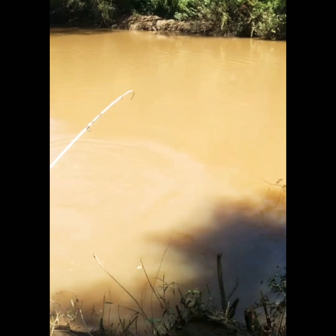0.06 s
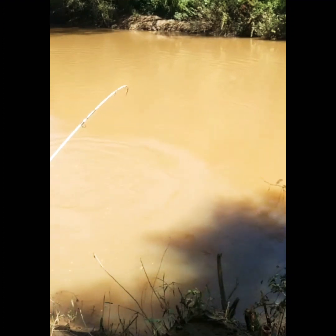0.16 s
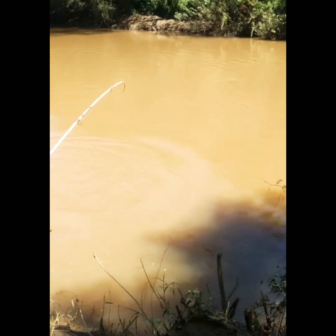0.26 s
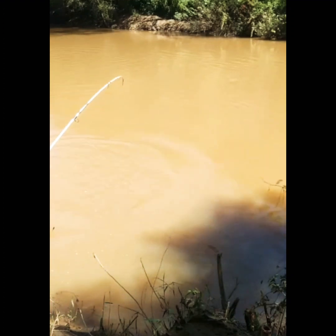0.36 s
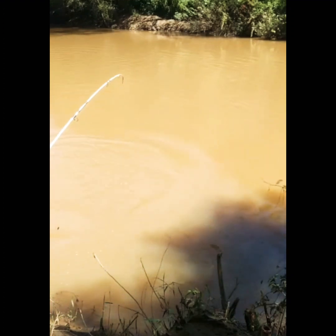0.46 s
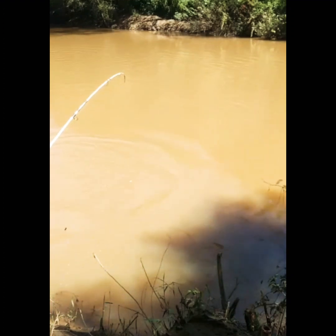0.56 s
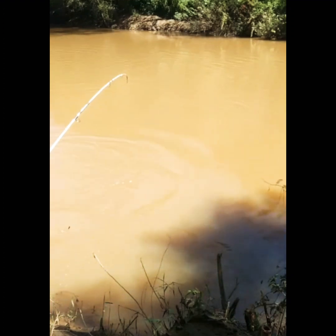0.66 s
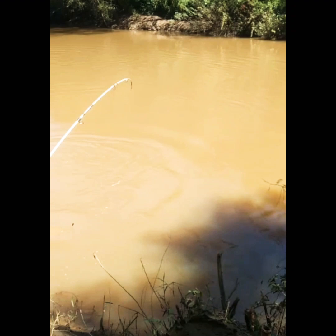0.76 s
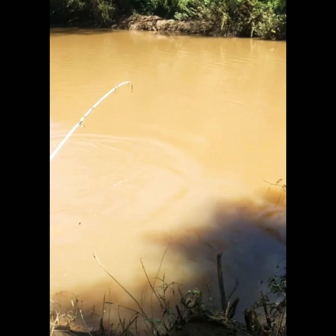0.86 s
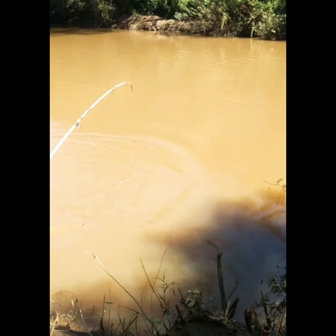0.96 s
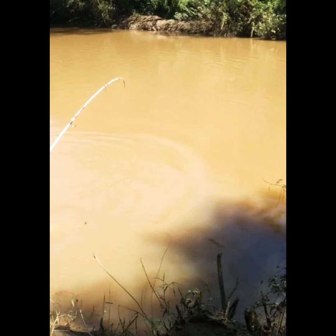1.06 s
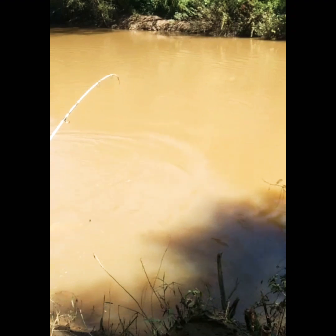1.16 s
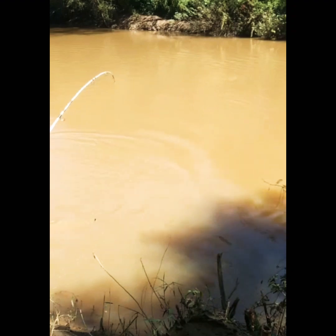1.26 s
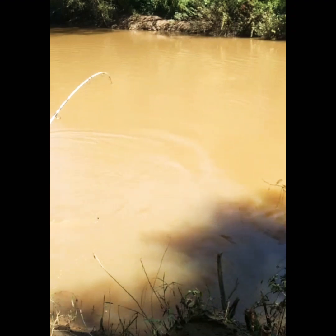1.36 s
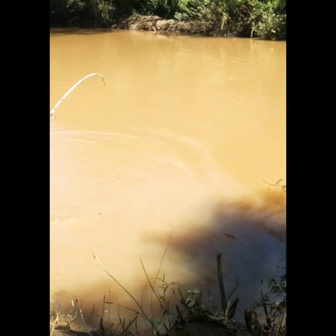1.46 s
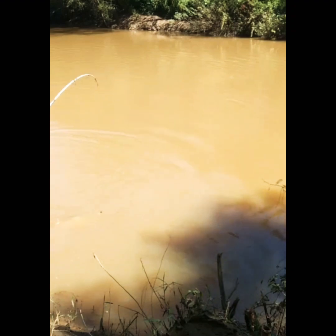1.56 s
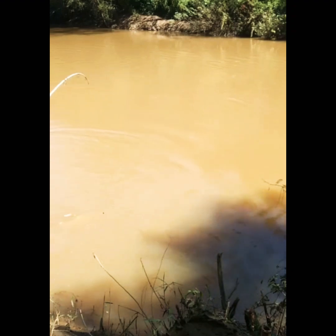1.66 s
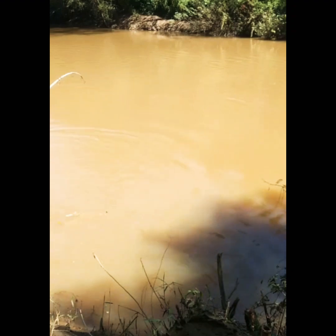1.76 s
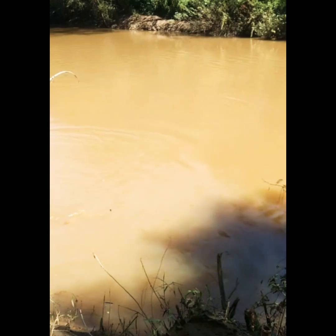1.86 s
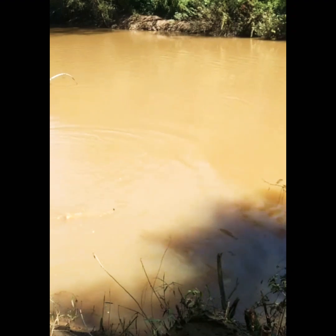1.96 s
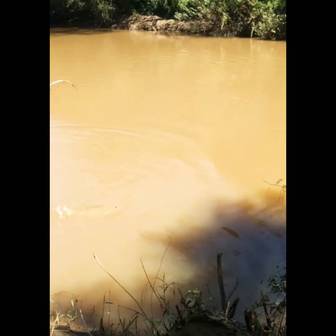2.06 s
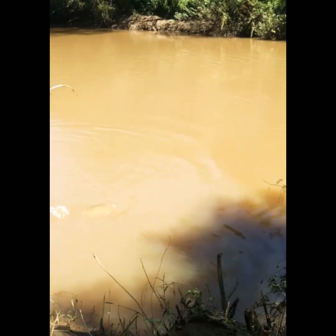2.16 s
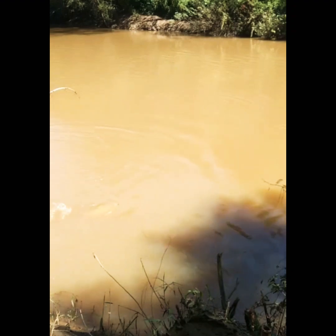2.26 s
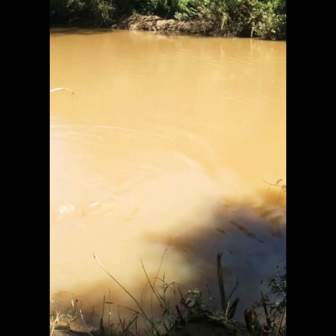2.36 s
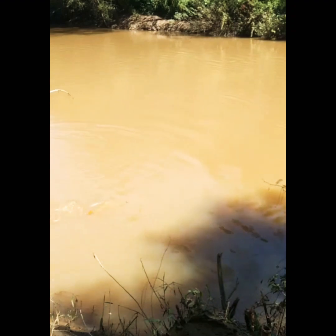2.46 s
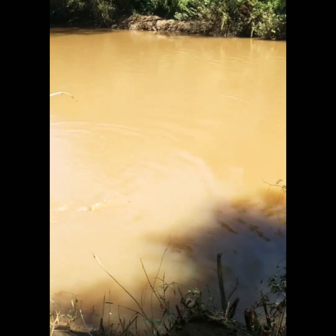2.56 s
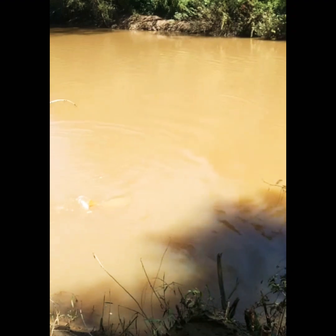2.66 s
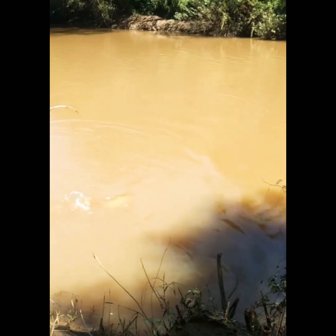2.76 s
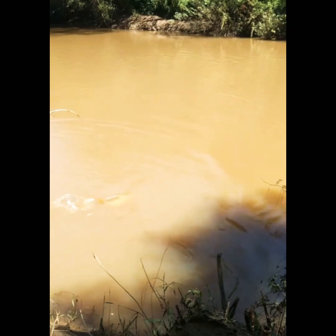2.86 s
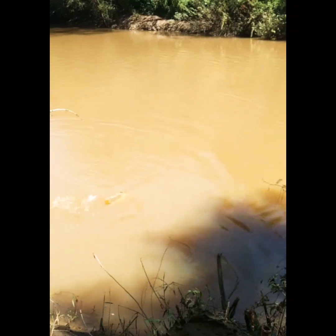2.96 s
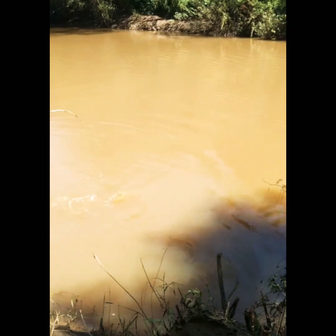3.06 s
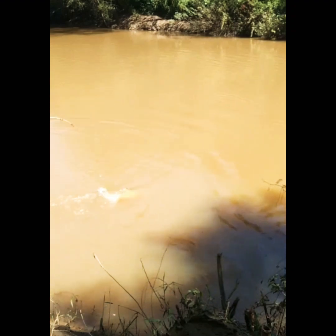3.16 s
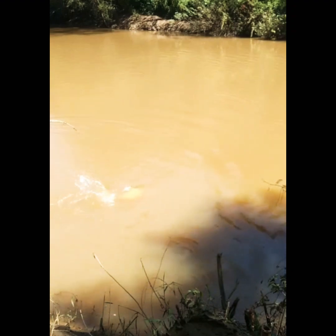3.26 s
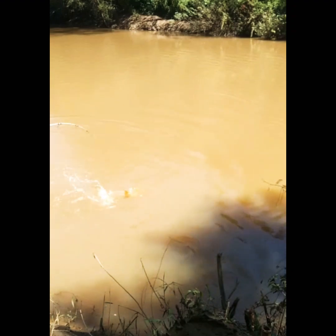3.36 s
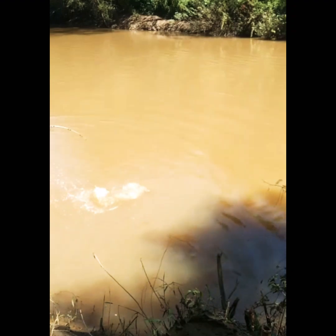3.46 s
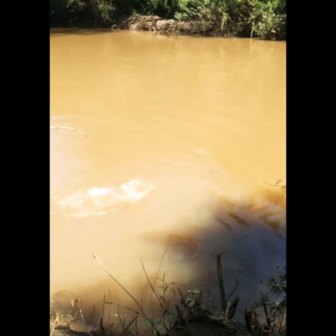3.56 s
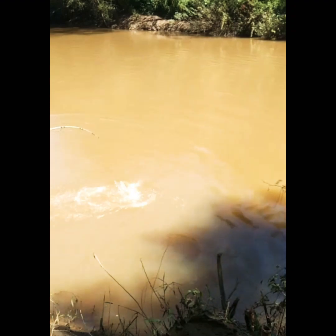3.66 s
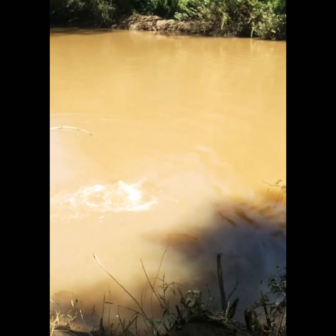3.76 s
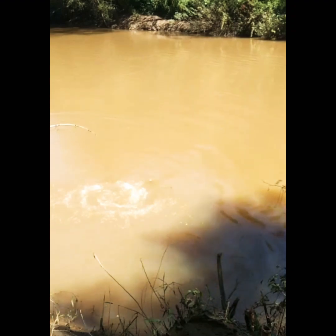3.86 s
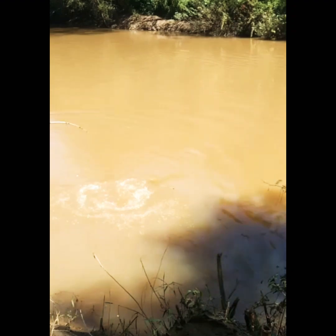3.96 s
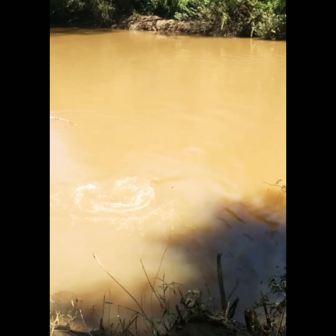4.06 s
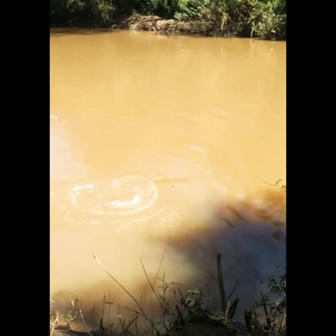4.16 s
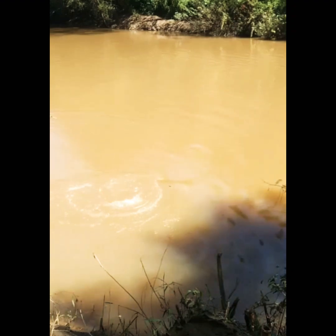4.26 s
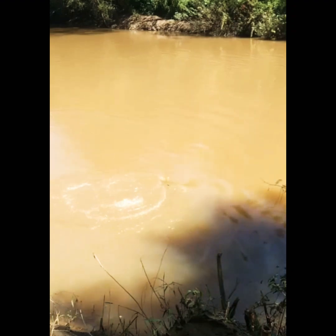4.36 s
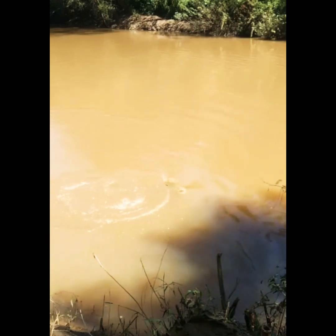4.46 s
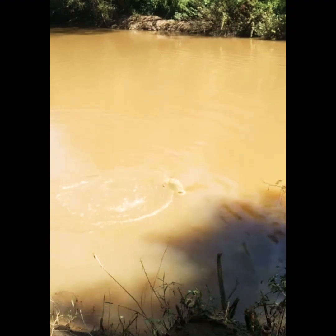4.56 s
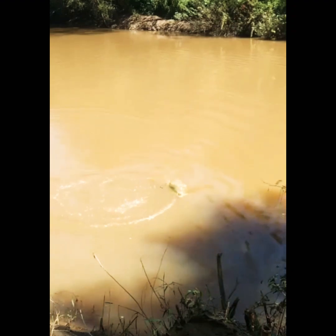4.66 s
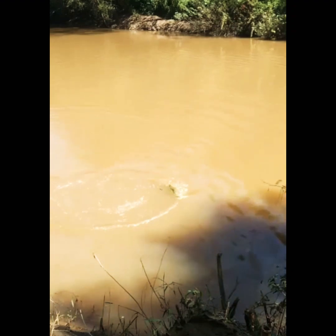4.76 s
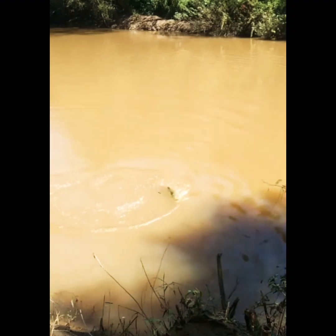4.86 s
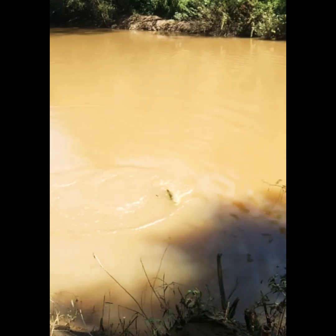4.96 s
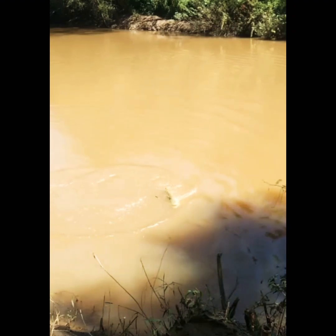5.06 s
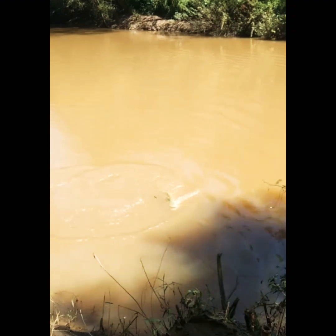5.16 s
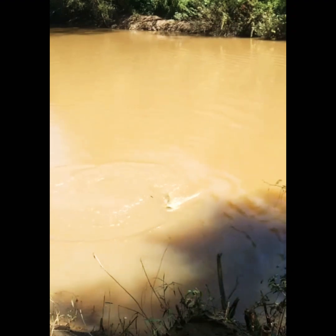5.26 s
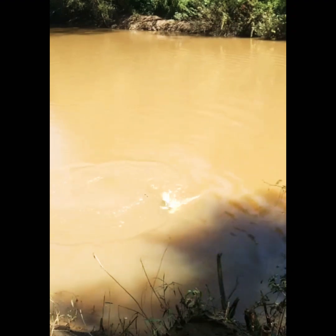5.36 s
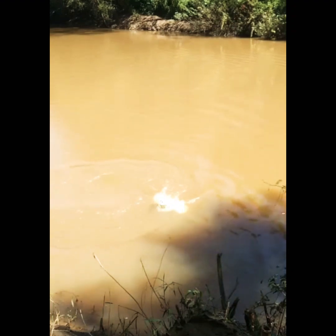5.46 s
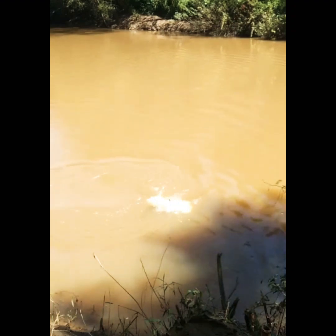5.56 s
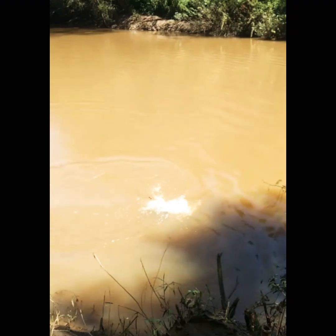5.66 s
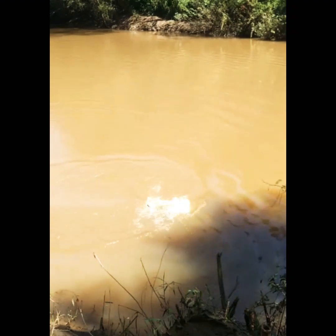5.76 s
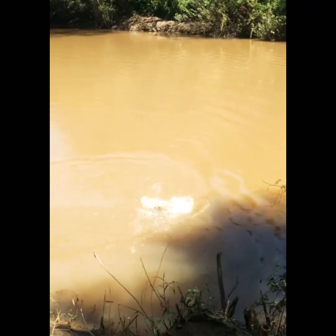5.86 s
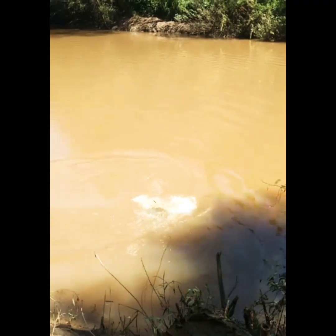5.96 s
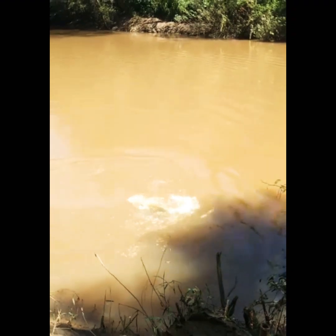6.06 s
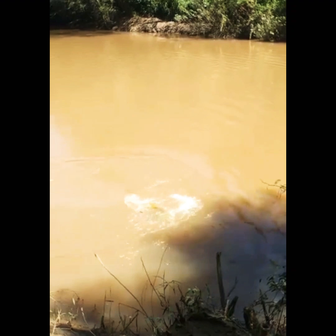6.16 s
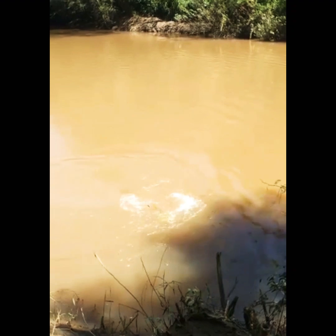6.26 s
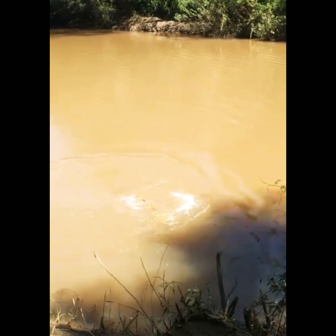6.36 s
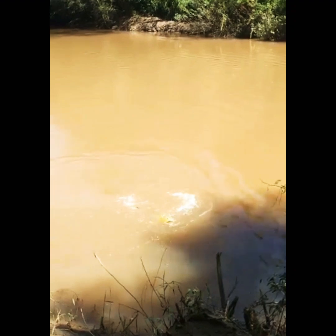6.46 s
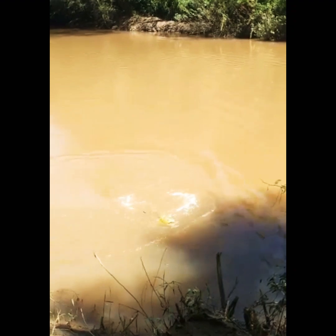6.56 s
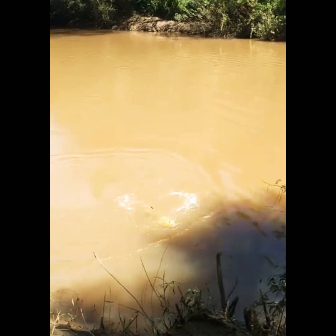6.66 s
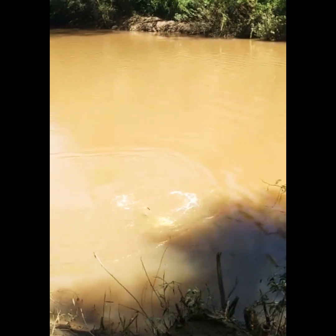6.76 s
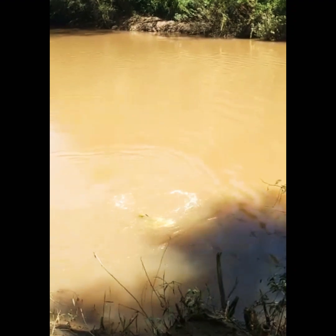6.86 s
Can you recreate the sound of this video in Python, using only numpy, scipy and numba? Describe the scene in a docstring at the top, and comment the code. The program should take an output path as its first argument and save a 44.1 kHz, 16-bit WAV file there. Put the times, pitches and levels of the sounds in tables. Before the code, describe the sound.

Quiet riverbank water ticks and plops, then two bursts of churning splashes, each gurgling and pattering away into near silence.

```python
"""A hooked fish thrashes twice at the surface of a slow muddy river, close to a phone on the bank.
Thrashes and short flicks are crowds of ringing bubbles and droplet grains with moving levels; slaps
are bursts of shaped noise. Single bubbles plop and glide over a noise hush, a narrow-band insect
whine and faint tone whistles. The phone steers its two microphone ports into a stereo pair."""
import sys
import numpy as np
from scipy import signal
from scipy.fft import rfft, irfft
from scipy.io import wavfile
from scipy.ndimage import uniform_filter1d
from numba import njit

SR = 44100
rng = np.random.default_rng(int(sys.argv[2]) if len(sys.argv) > 2 else 0)


def pcm_store(signal):
    """Save signal as 16-bit PCM."""
    levels = np.round(np.clip(np.atleast_2d(signal), -1, 1) * 32767)
    wavfile.write(sys.argv[1], SR, levels.astype(np.int16).T)


N = 304290


def gain_of(db):
    """Decibels to amplitude gain."""
    return 10 ** (np.asarray(db) / 20)


def evened(x):
    """Scales to rms 1."""
    return x / np.sqrt(np.mean(x ** 2) + 1e-20)


def read(points, hz):
    """Interpolates a (freq_hz, value) table on a log-frequency axis."""
    freq_hz, value = np.transpose(points)
    return np.interp(np.log(hz + 1), np.log(freq_hz + 1), value)


def curve(rows):
    """Interpolates every column of a time table at each sample."""
    time_s, *columns = np.transpose(rows)
    t = np.arange(N) / SR
    return [np.interp(t, time_s, column) for column in columns]


def colour(x, points, lead_s=0.):
    """Filters by a dB spectrum, with an optional lead in time."""
    hz = np.fft.rfftfreq(N, 1 / SR)
    lead = np.exp(2j * np.pi * hz * lead_s)
    return irfft(rfft(x) * gain_of(read(points, hz)) * lead, N)


def laid(events):
    """Lays (start_s, sound) pairs on one track."""
    out = np.zeros(N + SR)
    for start_s, sound in events:
        out[round(start_s * SR):][:len(sound)] += sound
    return out[:N]


@njit
def add(mix, grains):
    """Mixes in grains that swell, ring and die; rows (first sample, size, turns a sample, cycles, rise)."""
    for k in range(len(grains)):
        start, step, rise = int(grains[k, 0]), grains[k, 2], grains[k, 4]
        length = int(grains[k, 3] / step) + 2
        size = grains[k, 1] / np.sqrt(length)  # energy independent of length
        fade = np.exp(-9 / length)
        turns = 0.
        for i in range(min(length * 3 // 4, len(mix) - start)):
            turns += step * (1 + rise * i / length)
            size *= fade
            mix[start + i] += size * i / length * np.sin(2 * np.pi * turns)


def swarm(pitch, per_s, cycles, rise, uneven_db):
    """Random bubbles of uneven size, rms 1; pitch maps (sample, chance) to (Hz, gain)."""
    place, kind, loud, long, bend = rng.random((int(per_s * N / SR), 5)).T
    at = (place * N).astype(int)
    hz, gain = pitch(at, kind)
    size = gain * gain_of(uneven_db * np.minimum(-np.log(loud), 4))
    grains = np.column_stack([at, size, hz / SR, cycles * (.5 + long), rise * (3 * bend - 1)])
    heard = gain > gain.max() / 10
    out = np.zeros(N)
    add(out, grains[heard])
    return evened(out)


# hush spectrum shape: freq_hz, density_db (per Hz, relative)
HUSH_SPECTRUM = [(15, -60), (25, -12), (53, -0.5), (165, 0.5), (306, -7), (379, -10), (763, -13),
                 (1140, -18), (2180, -37), (3840, -18.5), (4390, -33.5), (6930, -23.5), (15600, -42.5)]
# far port over near port: freq_hz, ratio_db
HUSH_FAR_OVER_NEAR = [(60, -9.5), (300, 10), (800, 6.5), (1150, -6.5), (1750, -29), (2500, -6), (8000, -6),
                      (15000, -3)]
HUSH_RMS_DB = -58.5


def hush():
    """Air and far water: noise unrelated at the two ports, in drifting time-frequency patches."""
    frames, hz = N // 256 + 5, np.fft.rfftfreq(1024, 1 / SR)
    a, b, c, d, patches = rng.standard_normal((frames, 513, 5)).T
    patches = uniform_filter1d(patches, size=12, axis=0)
    patches = evened(uniform_filter1d(patches, size=14, axis=1))
    half_ratio_db = read(HUSH_FAR_OVER_NEAR, hz)[:, None] / 2
    z = np.array([(a + 1j * b) * gain_of(-half_ratio_db), (c + 1j * d) * gain_of(half_ratio_db)])
    z *= gain_of(read(HUSH_SPECTRUM, hz)[:, None] + 2.6 * patches)
    noise = signal.istft(z, nperseg=1024, noverlap=768)[1][:, :N]
    return gain_of(HUSH_RMS_DB) * evened(noise)


def resonate(x, hz, width_hz):
    """Band-passes by shifting hz down to zero, smoothing twice and shifting back."""
    turn = np.exp(2j * np.pi * np.cumsum(hz * np.ones(N)) / SR)
    r = np.exp(-np.pi * width_hz / SR)
    return (turn * signal.lfilter([1], np.convolve([1, -r], [1, -r]), x / turn)).real


def whistle(start_s, length_s, level_db, first_hz, last_hz):
    """A pure tone that swells, slides (wide slides down level off) and fades."""
    u = np.arange(0, length_s, 1 / SR) / length_s
    ratio = last_hz / first_hz
    turns = np.cumsum(first_hz * ratio ** u ** ratio) / SR
    return start_s, gain_of(level_db) * np.sqrt(np.sin(np.pi * u)) * np.sin(2 * np.pi * turns)


# steady insect chorus, one row: centre_hz, width_hz, rms_db
INSECT_WHINE = (6800, 77, -70)
# faint whistles, perhaps far birds: start_s, length_s, level_db, first_hz, last_hz
FAINT_WHISTLES = [(2.475, .045, -58, 2750, 1900), (2.87, .065, -55, 2700, 1700),
                  (3.085, .055, -58, 2800, 1950), (2.585, .22, -68, 6750, 6250),
                  (3.71, .11, -55, 2625, 2635)]


def insects():
    """Narrow-band noise as a fuzzy steady whine, plus the faint whistles."""
    centre_hz, width_hz, rms_db = INSECT_WHINE
    whine = evened(resonate(rng.standard_normal(N), centre_hz, width_hz))
    return gain_of(rms_db) * whine + laid(whistle(*row) for row in FAINT_WHISTLES)


def bubble(hz, cycles, rise_octaves, swell):
    """A pocket of air rings and dies; its pitch climbs as it nears the surface. Envelope peak 1."""
    cycles = max(cycles, 6)
    u = np.arange(int(cycles / hz * SR)) * hz / SR / cycles
    turns = np.cumsum(hz * 2 ** (rise_octaves * u)) / SR
    shape = (1 - np.exp(-u / abs(swell))) ** 2 * gain_of(-60 * u)
    return shape / shape.max() * np.sin(2 * np.pi * turns)


# single bubbles: start_s, level_db (relative), start_pitch_hz, cycles (to -60 dB, at least 6 rung)
SINGLE_BUBBLES = [(.02, -47, 1640, 33), (0.079, -51, 1060, 14), (.222, -45, 493, 11), (.303, -50, 454, 32),
                  (.343, -42.5, 1585, 41), (0.506, -45.5, 1550, 44), (0.517, -41.5, 418, 39),
                  (0.55, -35, 440, 21), (.62, -45, 608, 29), (.64, -47, 764, 27), (.692, -49.5, 1250, 20),
                  (.768, -41, 768, 28), (.932, -29.5, 586.4, 39), (0.936, -22.5, 2290, 9.5),
                  (.935, -29, 597.5, 55), (1.086, -34, 587, 25), (1.086, -37.5, 426, 34),
                  (1.294, -52, 623, 57), (1.33, -55, 1350, 30), (1.514, -49, 1100, 37),
                  (1.539, -51, 1300, 30), (1.556, -37.5, 2630, 40), (1.583, -38.5, 1430, 32),
                  (1.606, -32, 1107, 29), (1.607, -34, 3070, 45), (1.669, -43.5, 1030, 19),
                  (1.703, -42, 1280, 21), (1.75, -41, 1420, 27), (1.854, -48, 1290, 43),
                  (2.083, -45, 1370, 12), (2.083, -46, 2220, 33), (2.172, -43, 2370, 38),
                  (2.19, -48, 1310, 42), (2.231, -28.5, 1310, 36), (2.238, -32, 1030, 46),
                  (2.242, -37, 2320, 49), (2.264, -39.5, 368, 39), (2.305, -39, 2870, 38),
                  (2.306, -32.5, 1120, 22), (2.319, -36.5, 1360, 28), (2.334, -42, 1460, 33),
                  (2.353, -38.5, 1300, 40), (2.372, -37, 1100, 40), (2.408, -29, 986, 11.5),
                  (2.507, -38, 1060, 21), (2.549, -34.5, 1124, 21), (2.59, -33.5, 1640, 17),
                  (2.656, -49.5, 910, 33), (2.72, -54, 1400, 27), (2.812, -41, 1970, 40),
                  (2.838, -45, 1080, 36), (2.852, -42, 2650, 40), (2.866, -32, 1110, 24),
                  (2.92, -40, 1090, 18), (3.01, -40, 2540, 32), (3.04, -51, 1580, 50),
                  (3.083, -42, 1260, 18), (3.148, -35, 687, 49), (3.2, -33.5, 1096, 28),
                  (3.222, -40, 900, 24), (3.241, -25.5, 1350, 4), (3.24, -29, 2420, 27),
                  (3.273, -24, 463, 14), (3.284, -23.5, 380, 17), (3.284, -33, 830, 35),
                  (3.311, -23.5, 209, 16), (3.32, -25, 232, 7.5), (3.365, -30, 336, 12),
                  (3.399, -27, 1150, 26), (3.425, -17.5, 382, 11), (3.449, -27, 837, 25),
                  (3.467, -22, 820, 14), (3.476, -15.5, 690, 11), (3.49, -18, 605, 9.5),
                  (3.5, -31.5, 202.5, 17.5), (3.515, -20.5, 860, 18), (3.573, -30.5, 997, 40),
                  (3.58, -28.5, 330, 24), (3.62, -25.5, 1117, 30), (3.638, -29.5, 321, 30),
                  (3.639, -29, 1240, 27), (3.716, -29.5, 1086, 35), (3.719, -34, 538, 37),
                  (3.763, -34, 325, 28), (3.786, -34, 1040, 25), (3.802, -33, 546, 19),
                  (3.86, -26.5, 1050, 13), (3.919, -31, 1700, 41), (3.954, -36, 1017, 40),
                  (4.02, -30.5, 1065, 21), (4.043, -28.5, 1095, 8), (4.129, -40, 1090, 29),
                  (4.2, -33.5, 1680, 25), (4.206, -37, 890, 12), (4.229, -42, 297, 30),
                  (4.263, -35, 304, 16), (4.316, -37.5, 1100, 17), (4.333, -41.5, 570, 21),
                  (4.407, -39, 714, 18), (4.417, -37, 877, 22), (4.469, -45, 1100, 30),
                  (4.538, -40.5, 1020, 8), (4.65, -43.5, 1094, 25), (4.71, -43, 817, 42),
                  (4.716, -39.5, 1100, 28), (4.791, -46.5, 2750, 48), (5.343, -38, 980, 4.5),
                  (5.421, -39, 1670, 27), (5.428, -37, 498, 29), (5.439, -35.5, 1090, 28),
                  (5.476, -30, 2740, 37), (5.477, -24.5, 646, 12), (5.5, -14.5, 353, 10.5),
                  (5.502, -20, 676, 9.5), (5.521, -11.5, 285, 9), (5.545, -22, 238, 0.5),
                  (5.542, -26, 824, 19), (5.567, -24.5, 535, 34), (5.615, -18, 398, 11.5),
                  (5.627, -33.5, 2720, 40), (5.643, -25.5, 185, 4.5), (5.67, -33.5, 2740, 38),
                  (5.696, -21, 226, 3), (5.739, -31, 362, 17), (5.766, -34, 2680, 38), (5.8, -26, 1360, 11),
                  (5.801, -23, 1650, 28), (5.896, -34, 646, 36), (5.947, -35, 1044, 53),
                  (6.017, -42.5, 632, 59), (6.049, -41, 544, 19), (6.112, -40, 820, 29),
                  (6.161, -43.5, 1200, 34), (6.259, -37.5, 1120, 28), (6.386, -44, 1330, 35),
                  (6.877, -38, 620, 12.5)]
# pockets closing at the surface, pitch sweeping up:
# start_s, level_db (relative), start_pitch_hz, cycles (to -60 dB), rise_octaves
SURFACE_GLIDES = [(.372, -48.5, 692, 85, 1.6), (.39, -47, 852, 100, 3.2), (.776, -48.5, 880, 100, 3.4),
                  (4.39, -37, 421.5, 52, 3.2), (4.412, -39.5, 514, 61, 2.5), (4.8, -49.5, 660, 64, 0.86),
                  (6.266, -45.5, 1150, 70, 3.4)]
CLIMB_OCTAVES_PER_CYCLE = 0.0047  # a bubble that rings longer climbs further
PLOP_TRIM_DB = -4.0


def plops():
    """Air pockets heard one by one, each a decaying sine of rising pitch."""
    rows = [(start_s, level_db, hz, cycles, CLIMB_OCTAVES_PER_CYCLE * cycles)
            for start_s, level_db, hz, cycles in SINGLE_BUBBLES]
    return laid((start_s, gain_of(level_db + PLOP_TRIM_DB) * bubble(*shape, swell=0.054))
                for start_s, level_db, *shape in rows + SURFACE_GLIDES)


def bank(x, t60_s):
    """Sparse taps of random sign off the bank and reeds, other ones for each port."""
    at = np.arange(40, 6000, 20) + rng.integers(0, 20, (2, 298))
    taps = np.zeros((2, 6020))
    tap_gain = rng.choice([-1., 1.], at.shape) * gain_of(-60 * at / SR / t60_s)
    np.put_along_axis(taps, at, tap_gain, axis=1)
    return signal.oaconvolve(x[None], taps / np.linalg.norm(taps[0]), axes=1)[:, :N]


# slaps of tail and falling water: start_s, level_db (relative), centre_hz
WATER_SLAPS = [(.345, -49, 4100), (.503, -51, 5740), (.812, -46, 2470), (0.81, -50, 4370),
               (.933, -29, 4930), (.933, -16, 760), (.94, -26, 880), (1.448, -39.5, 1900),
               (1.461, -38, 4000), (1.558, -45, 2670), (1.607, -29, 1150), (1.613, -35.5, 3150),
               (1.671, -40, 2790), (1.942, -46, 2640), (2.081, -40, 2050), (2.168, -35.5, 2300),
               (2.237, -23, 1060), (2.239, -25.5, 3850), (2.358, -36, 2570), (2.481, -50, 2380),
               (2.588, -42.5, 2340), (2.919, -40.5, 4390), (3.01, -45, 2640), (3.142, -42, 4100),
               (3.223, -42, 2370), (3.398, -38, 4190), (3.491, -25, 703), (3.787, -17, 1010),
               (4.206, -25.5, 880), (4.216, -45, 2480), (4.628, -45, 2730), (5.438, -38, 2670),
               (5.475, -37, 2800), (5.4995, -10.5, 1230), (5.502, -17, 751), (5.765, -28.5, 2750),
               (5.8, -16, 1400), (5.864, -46, 2010), (6.058, -35.5, 4560), (6.364, -41, 2440),
               (6.427, -42, 7000)]
# deep slaps thud, high ones spatter longer: centre_hz, t60_s
SLAP_DECAY = [(1400, 0.023), (2000, 0.11)]
SLAP_TREBLE_DB = -26  # against the body
SLAP_TRIM_DB = -10.5  # rms of the hiss lies under its peak


def slaps():
    """Sudden hiss that dies quickly: noise banded round centre_hz plus a little treble."""
    t = np.arange(N // 40) / SR
    treble_sos = signal.butter(4, 9500, "high", fs=SR, output="sos")
    attack = 1 - np.exp(-t / 0.0014)
    noises = rng.standard_normal((len(WATER_SLAPS), 2, len(t)))
    bursts = []
    for (start_s, level_db, centre_hz), (a, b) in zip(WATER_SLAPS, noises):
        edges_hz = centre_hz * 2 ** (0.24 * np.array([-1, 1]))
        body = signal.sosfilt(signal.butter(1, edges_hz, "band", fs=SR, output="sos"), a)
        treble = signal.sosfilt(treble_sos, b)
        hiss = evened(body) + gain_of(SLAP_TREBLE_DB) * evened(treble)
        fall_db = -60 * t / abs(read(SLAP_DECAY, centre_hz))
        bursts.append((start_s, hiss * gain_of(level_db + SLAP_TRIM_DB + fall_db) * attack))
    return laid(bursts)


# spray spectrum: freq_hz, level_db (relative)
SPRAY_SPECTRUM = [(1800, 3.5), (2800, 0), (4500, -2.5), (6500, -9), (9000, -11)]


def stirred(spray_gain, fine_gain):
    """Dense droplets thrown up and falling back: two swarms of short ringing grains."""
    def small(at, kind):
        hz = 1500 * 2 ** (2.7 * kind)
        return hz, gain_of(read(SPRAY_SPECTRUM, hz)) * np.sqrt(hz)  # sqrt offsets the log spacing

    def tiny(at, kind):
        return 9500 + 6100 * kind, gain_of(11.3 * kind)

    spray = swarm(small, per_s=3500, cycles=27.2, rise=0.094, uneven_db=-0.5)
    fine = swarm(tiny, per_s=3900, cycles=3.0, rise=0.03, uneven_db=1.0)
    return spray_gain * spray + fine_gain * fine


def churn(churn_gain, usual_hz):
    """A crowd of large bubbles, pitches in a bell curve round a moving usual_hz."""
    def large(at, kind):
        hz = 150 * 2 ** (3.9 * kind)
        return hz, np.exp(-.5 * (np.log2(hz / usual_hz[at]) / 1.336) ** 2)

    bubbles = swarm(large, per_s=1200, cycles=14.9, rise=0.37, uneven_db=2.5)
    return churn_gain * gain_of(-4.5) * bubbles


# barely moving water: time_s, churn_db (relative), usual_bubble_hz, spray_db, fine_spray_db
CALM_WATER = [(0, -64.5, 660, -87, -74.5), (.8, -63.5, 696, -70.5, -73), (1.3, -59, 580, -67.5, -71),
              (2, -61.5, 550, -69, -72), (2.7, -59, 750, -67, -72.5), (5.1, -63.5, 613, -70, -71),
              (6.9, -65, 597, -74.5, -69)]
# two thrashes, build-up to last trickle: time_s, churn_db (relative), usual_bubble_hz, spray_db, fine_spray_db
FISH_THRASHES = [
    [(2.6, -80, 900, -69, -90), (2.86, -58, 1110, -61, -77), (3.1, -55.5, 950, -57, -66),
     (3.21, -57, 950, -63, -80), (3.26, -50, 450, -60, -68), (3.28, -29, 415, -42.5, -59),
     (3.35, -41, 416, -50.5, -64), (3.43, -32.5, 484, -43.5, -56.5), (3.51, -35.5, 725, -46.5, -57),
     (3.56, -42.5, 880, -50, -63), (3.63, -35, 930, -44.5, -51.5), (3.73, -37.5, 835, -47.5, -47.5),
     (3.84, -38, 835, -48, -58), (3.94, -40, 1080, -47.5, -58), (4.16, -53, 1050, -60.5, -70),
     (4.4, -46.5, 565, -62.5, -70), (4.6, -60, 850, -64, -76), (4.82, -57.5, 865, -63.5, -74),
     (4.92, -66, 600, -68, -90)],
    [(5.39, -84, 700, -80, -90), (5.44, -47, 770, -53, -70), (5.503, -27, 455, -38.5, -51),
     (5.52, -29, 350, -40.5, -54), (5.55, -31.5, 352, -43, -58), (5.67, -34, 450, -49, -64),
     (5.74, -33.5, 400, -46, -57), (5.79, -33, 690, -43, -53), (5.88, -35.5, 890, -41, -53),
     (5.98, -42.5, 745, -50, -66), (6.11, -45, 825, -55, -65), (6.28, -56.5, 875, -63.5, -72),
     (6.42, -57, 900, -64, -83), (6.5, -60.5, 800, -66, -87)],
]
# short flicks of the surface: peak_s, churn_db (relative), usual_bubble_hz, spray_db, fine_spray_db
SURFACE_FLICKS = [(.35, -53.5, 1100, -67, -78), (.55, -48.5, 470, -60, -73), (.94, -43, 630, -45.5, -58),
                  (1.07, -53.5, 540, -66, -76), (1.48, -58, 494, -60, -80), (1.612, -59, 1150, -49, -58.5),
                  (1.7, -50, 1150, -58.5, -66), (2.09, -79, 1250, -63, -68),
                  (2.248, -36.5, 1210, -41.5, -50.5), (2.36, -47, 1150, -52, -65),
                  (2.5, -52, 1050, -58.5, -72), (2.7, -72, 900, -62, -74), (2.925, -70, 1000, -73, -68),
                  (3.15, -57, 670, -65, -76), (4.259, -47, 350, -52.5, -72), (4.7, -53, 1100, -58.5, -76),
                  (5.25, -56, 790, -63, -76), (5.35, -54, 790, -68, -82), (6.01, -42, 517, -49.5, -55.5),
                  (6.32, -51.5, 474, -76, -80), (6.432, -66, 900, -62, -64)]
FLICK_RISE_DB_PER_S, CHURN_FALL_DB_PER_S, SPRAY_FALL_DB_PER_S = 466, 320, 160


def stir():
    """Calm, thrashes and flicks add in power; usual_hz is their power-weighted mean log pitch."""
    t = np.arange(N) / SR
    # rows: churn, pitch (constant within a flick), spray, fine spray
    fall = np.array([[CHURN_FALL_DB_PER_S], [0], [SPRAY_FALL_DB_PER_S], [SPRAY_FALL_DB_PER_S]])
    rise = FLICK_RISE_DB_PER_S * np.sign(fall)
    parts = [np.array(curve(rows)) for rows in [CALM_WATER] + FISH_THRASHES]
    for peak_s, *peak in SURFACE_FLICKS:
        drop = np.maximum(rise * (peak_s - t), fall * (t - peak_s))
        parts.append(np.array(peak)[:, None] - drop)
    # control rate: every 64th sample
    churn_db, hz, spray_db, fine_db = np.swapaxes(parts, 0, 1)[..., ::64]
    power = [gain_of(2 * db) for db in (churn_db, spray_db, fine_db)]
    usual_hz = np.exp((power[0] * np.log(hz)).sum(0) / power[0].sum(0))
    slow = [np.sqrt(p.sum(0)) for p in power] + [usual_hz]
    return [np.interp(t, t[::64], v) for v in slow]


# direct sound at the far port: freq_hz, level_db
FAR_SHADOW = [(150, -0.8), (450, -7), (900, -13), (1500, 3), (2500, -54), (6000, -27)]
# scattered sound at the far port: freq_hz, level_db
FAR_SCATTER = [(200, -9), (600, -11.5), (1100, 2), (1700, -1), (2400, -2), (8000, 1.5), (15000, -4)]


def scene():
    """The sound at the port facing the water and at the port shadowed by the phone's body."""
    churn_gain, spray_gain, fine_gain, usual_hz = stir()

    def splash():
        """One independent draw of the splashing water."""
        return churn(churn_gain, usual_hz) + stirred(spray_gain, fine_gain) + slaps()

    single = plops() + insects()
    echo = bank(single, t60_s=0.088)
    near = single + gain_of(-4.5) * echo[0] + splash()
    direct = colour(near, FAR_SHADOW, lead_s=.00004)
    # many scattered paths: fine detail unrelated to the near port
    scattered = colour(echo[1] + splash(), FAR_SCATTER)
    return np.array([near, direct + scattered]) + hush()


# share of the delayed port: freq_hz, share (0..1)
STEER_SHARE = [(30, 0.73), (150, 1), (600, 0.53), (1200, 0.61), (1750, 0.27), (2400, 0.68), (3500, 0.62),
               (5350, 1), (7100, 0.69), (8900, 0.22), (10700, 0.87), (12500, 0.37), (15000, 0.67)]
STEER_DELAY_S, BAND_EDGE_HZ = 24.75 / 44100, 15680


def record(dry):
    """Each side is one port minus the other port delayed, which combs the sum; then the band limit."""
    near, far = rfft(dry)
    hz = np.fft.rfftfreq(N, 1 / SR)
    late = np.clip(read(STEER_SHARE, hz), 0, 1) * np.exp(-2j * np.pi * hz * STEER_DELAY_S)
    pair = irfft(np.array([far - late * near, near - late * far]), N)
    low_pass = signal.firwin(511, BAND_EDGE_HZ, window=("kaiser", 9), fs=SR)
    return signal.oaconvolve(pair, low_pass[None], "same")


dry = scene()
out = record(dry)
pcm_store(out)
```